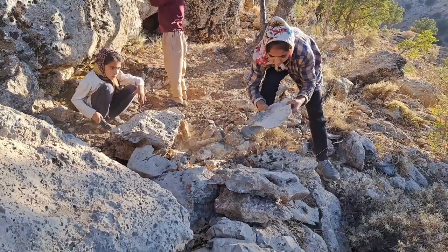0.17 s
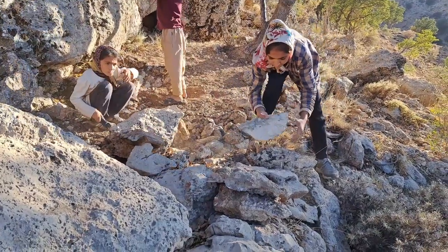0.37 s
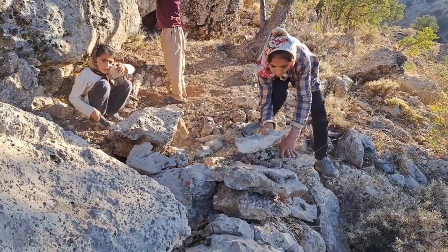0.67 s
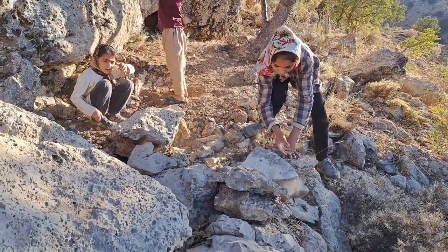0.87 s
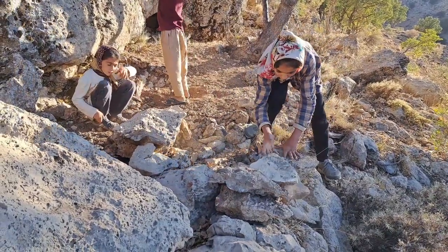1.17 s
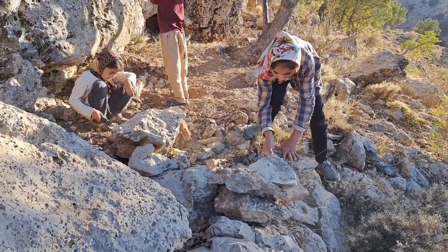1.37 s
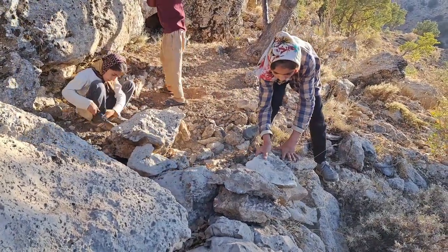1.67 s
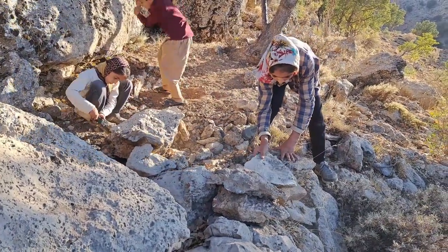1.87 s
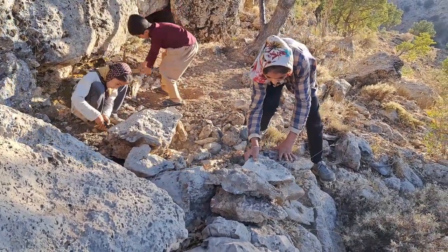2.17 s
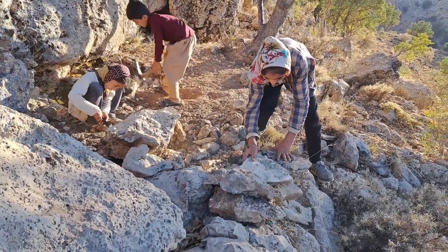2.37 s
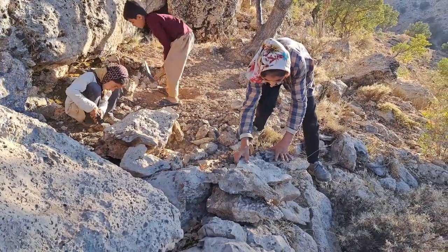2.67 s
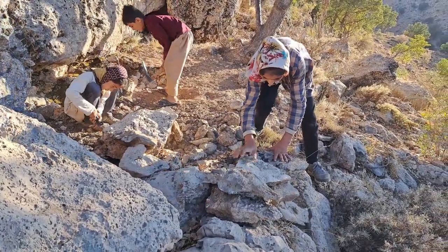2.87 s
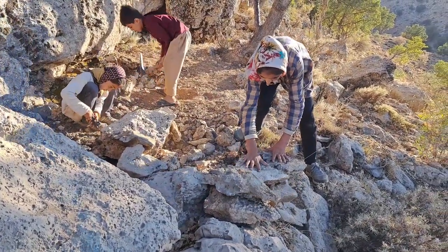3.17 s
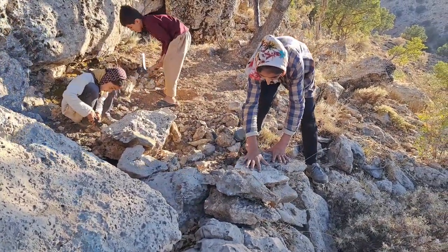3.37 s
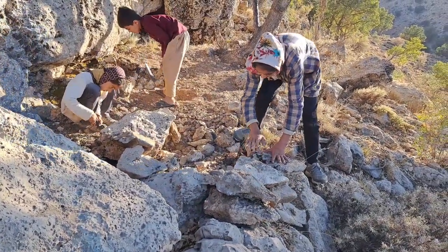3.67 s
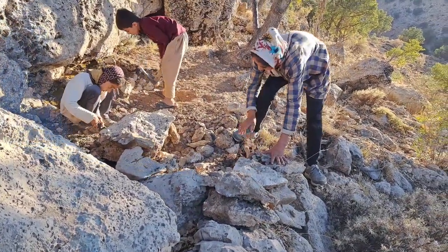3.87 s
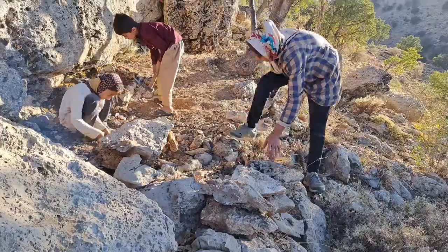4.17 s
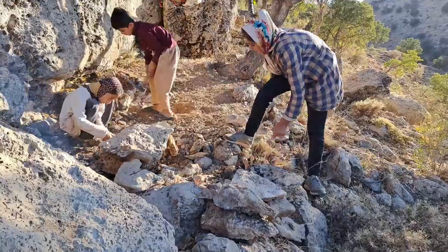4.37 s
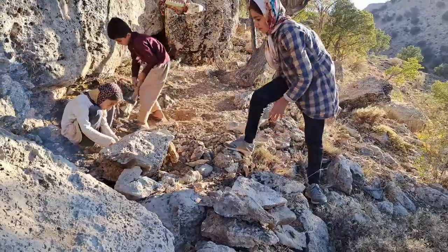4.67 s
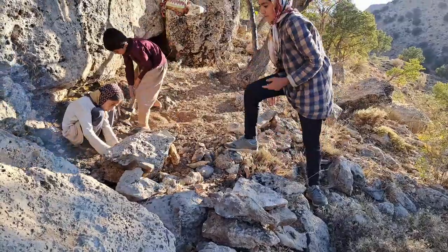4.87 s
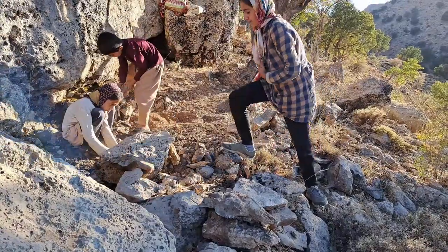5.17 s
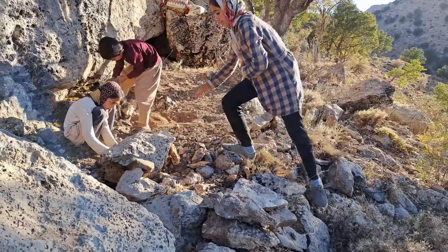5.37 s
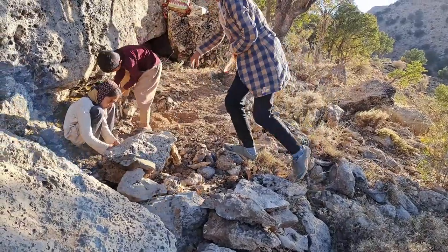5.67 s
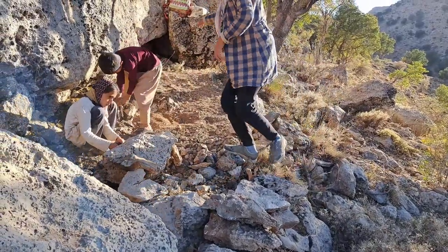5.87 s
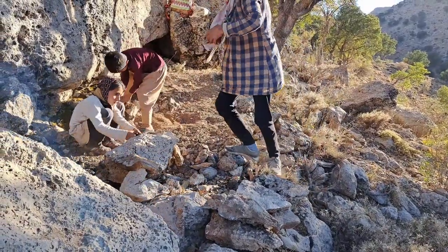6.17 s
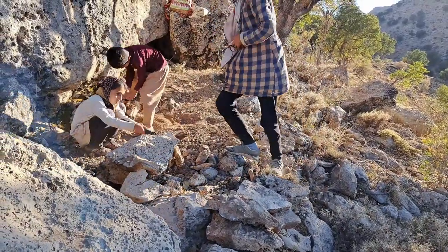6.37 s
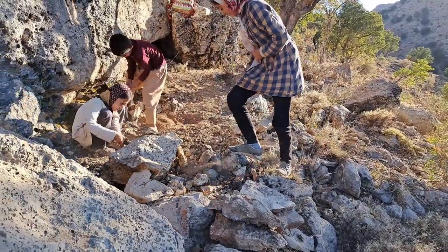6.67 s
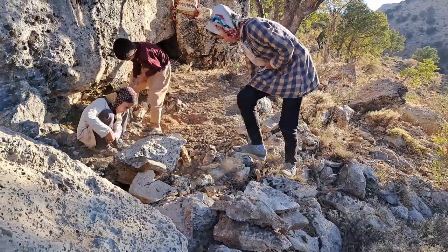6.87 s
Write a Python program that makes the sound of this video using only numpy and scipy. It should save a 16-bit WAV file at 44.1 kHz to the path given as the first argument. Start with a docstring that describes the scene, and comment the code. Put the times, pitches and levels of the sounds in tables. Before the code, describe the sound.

Close by on a quiet open hillside, light scuffs and ticks precede a flat stone slab landing with a hard ringing clink and a few rattling knocks. It grinds briefly; a smaller stone then cracks down sharply, scattering chips. More scraping settles the slab. Shoes crunch over grit and dry grass, heaviest near the end, with chattering pebbles. Faint air, low rumble and a far engine hum lie behind; stereo pickup.

```python
"""Limestone slab on a dry-stone wall

Close by, a flat slab clinks down, rocks and is ground into place: its modes ring, filtered grains rub.
A smaller stone cracks down beside it in short, high modes; contacts add noise clacks and ground thuds.
Shoes crunch over grit and dry grass, made of tiny random noise puffs; pebbles chatter, bright ticks snap.
Behind lies an open hillside: noise for air and low rumble, a far engine's harmonics, a weak rock echo."""
import sys
import numpy as np
from scipy import signal
from scipy.fft import rfft, irfft, next_fast_len
from scipy.io import wavfile
from scipy.ndimage import map_coordinates

SR = 44100
rng = np.random.default_rng(int(sys.argv[2]) if len(sys.argv) > 2 else 0)


def unload_audio(sound):
    """Save the sound as a 16-bit wav file, at the path given as the first command line argument."""
    columns = np.transpose(np.atleast_2d(sound))
    # keep every value between -1 and 1, then stretch to whole-number steps
    steps = np.round(np.clip(columns, -1, 1) * 32767)
    wavfile.write(sys.argv[1], SR, steps.astype(np.int16))


N = 309141
TIME = np.arange(N) / SR  # the whole scene, s
RING = np.arange(SR) / SR  # one second for a single sound, s


def amp(db):
    """Decibels to gain."""
    return 10 ** (np.asarray(db) / 20)


def unit(x):
    """Scale to rms 1."""
    return x / np.sqrt(np.mean(x ** 2) + 1e-20)


def along(points, hz):
    """Read (Hz, value) points on a log frequency axis."""
    point_hz, values = np.transpose(points)
    return np.interp(np.log(hz + 1), np.log(point_hz + 1), values)


def tone(points):
    """A gain over frequency from (Hz, dB) points."""
    return lambda hz: amp(along(points, hz))


def swell(rows):
    """Gain over time from (s, dB) rows."""
    return amp(np.interp(TIME, *np.transpose(rows)))


def wobble(rate):
    """A smooth random curve with this many knots a second."""
    knots = rng.standard_normal(int(N * rate / SR) + 4)
    return map_coordinates(knots, [TIME * rate])


def filtered(x, response):
    """Multiply the spectrum of x by a response of frequency."""
    n = x.shape[-1]
    size = next_fast_len(n + 8192)  # padded so the filter's tail does not wrap round
    hz = np.fft.rfftfreq(size, 1 / SR)
    return irfft(rfft(x, size) * response(hz), size)[..., :n]


def soft(hz, bright_hz):
    """A contact of finite length passes little above its brightness."""
    return 1 / np.sqrt(1 + (hz / bright_hz) ** 6)


def resonance(hz, centre_hz, q):
    """Gain of one resonance."""
    return 1 / np.sqrt(1 + q ** 2 * (hz / centre_hz - centre_hz / (hz + 1)) ** 2)


def panned(db):
    """Left and right gains for a level difference; positive is louder on the left."""
    return amp(np.array([[db], [-db]]) / 2)


# Likeness of the two microphones. Each row: frequency in Hz, left-right correlation.
MIC_LIKENESS = [(30, .4), (120, .93), (300, .88), (700, 0.66), (1400, 0.27), (3000, 0.081), (15000, 0.049)]


def spread(pair, colour):
    """Two unrelated signals become a coloured stereo pair of rms 1, alike in the bass."""
    def mid_side(hz):
        turn = np.arccos(np.clip(along(MIC_LIKENESS, hz), -1, 1)) / 2
        return colour(hz) * np.array([np.cos(turn), np.sin(turn)])

    mid, side = filtered(pair, mid_side)
    return unit(np.array([mid + side, mid - side]))


def noise(size, colour):
    """Coloured stereo noise of rms 1."""
    return spread(rng.standard_normal((2, size)), colour)


def dying(t60, attack):
    """A quick rise and an exponential decay."""
    return amp(-60 * RING / t60) * (1 - np.exp(-RING / attack))


def mode(hz, t60, pan_db, shift_hz=0, damping=1, lead=.00008):
    """One decaying sine; its phase leads at the left microphone as if reaching it a little earlier."""
    step = np.ones(SR) / SR
    cycles = np.cumsum(step * (hz + shift_hz)) + hz * np.array([[lead], [0]])
    decay = amp(-60 * np.cumsum(step * damping) / t60)
    attack = 1 - np.exp(-RING / 0.00025)
    return panned(pan_db) * np.sin(2 * np.pi * cycles) * decay * attack


def add(track, s, sound):
    """Mix a sound of up to one second into the track at time s."""
    room = track[:, round(s * SR):][:, :SR]
    room += sound[:, :room.shape[1]]


def grains(rate, spread_db, life):
    """Tiny fractures at random moments: short puffs of noise, a few much larger than the rest."""
    happens = rng.random(N) < rate / SR
    sizes = happens * amp(spread_db * np.minimum(rng.exponential(size=N), 4))
    power = signal.lfilter([1], [1, -np.exp(-1 / (life * SR))], sizes ** 2)
    return unit(np.sqrt(power) * rng.standard_normal((2, N)))


def chinks(rate, centre_hz, scatter, cycles):
    """Small stones touch at random, each ringing briefly at its own pitch; rms 1."""
    when, size, pitch, phase = np.transpose(rng.random((int(rate * N / SR), 4)))
    t = RING[:SR // 40]
    turns = centre_hz * np.exp(scatter * (2 * pitch[:, None] - 1)) * t
    rings = amp(-22 * size[:, None]) * np.exp(-turns / cycles)
    where = (when[:, None] * N).astype(int) + np.arange(len(t))
    # opposite phase offsets place each stone differently between the microphones
    ears = [rings * np.sin(2 * np.pi * turns + side * phase[:, None]) for side in (1, -1)]
    return unit(np.array([np.bincount(where.ravel(), ear.ravel(), N)[:N] for ear in ears]))


# a stroke climbs this far in its rise time and sinks as far in its fall time; 1 = pointed, 2 = bell
STROKE_DROP_DB, STROKE_ROUNDNESS = 19.5, 1.274


def strokes(rows):
    """Gain from (peak s, dB, rise s, fall s): each swells and dies away; overlaps add in power."""
    power = np.zeros(N)
    for s, db, rise, fall in rows:
        away = np.maximum((s - TIME) / rise, (TIME - s) / fall)
        near = away < 4
        level_db = db - STROKE_DROP_DB * np.abs(away[near]) ** STROKE_ROUNDNESS
        power[near] += amp(level_db) ** 2
    return np.sqrt(power)


# Colour of the open air. Each row: frequency in Hz, relative level in dB.
AIR_TONE = [(15, -39.5), (25, -23.5), (86, 3), (204, 5), (826, -11), (1240, -9.5), (1490, -20),
            (2630, -12.5), (3090, -31), (5580, -12.5), (9550, -23), (12800, -19), (15500, -24)]
# Swells of low rumble, from breeze, footfalls and the wall under a shove.
# Each row: peak in seconds, relative level in dB, rise and fall in seconds.
LOW_RUMBLES = [(.32, -51.5, 0.076, .28), (.57, -53, .15, 0.22), (1.23, -56.5, 0.17, 0.11),
               (1.61, -56, 0.072, 0.19), (2.57, -61.5, .2, 0.2), (3.3, -64.5, .15, 0.31),
               (4.8, -57.5, 0.057, 0.084), (6.02, -55.5, 0.058, 0.078), (6.31, -66, 0.23, .45),
               (6.96, -55.5, 0.089, .15)]
CALM_DB = -78  # rumble between the swells, on the same relative scale


def hillside():
    """Still air is gently wavering noise; breeze, footfalls and the shoved wall swell a low noise."""
    air = amp(-69.5 + 0.69 * wobble(0.93)) * noise(N, tone(AIR_TONE))
    low_noise = noise(N, lambda hz: resonance(hz, 65, q=1.0) ** 2)
    rumble = amp(-3.0) * (amp(CALM_DB) + strokes(LOW_RUMBLES)) * low_noise
    return air + rumble


# Swell of the engine across the valley. Each row: time in seconds, relative level in dB.
ENGINE_SWELL = [(0, -75.5), (1.0, -66.5), (1.8, -70), (2.4, -73.5), (3, -91.5), (7, -76.5)]
FIRING_HZ = 69.4  # mean firing rate


def far_engine():
    """Only the seventh and eighth harmonics of a distant engine carry, in a haze of noise."""
    turns = np.cumsum(FIRING_HZ + 0.13 * wobble(7.6)) / SR
    lines = np.zeros(N)
    for order, db in ((7, -2.5), (8, 0)):
        lines += amp(db + 2 * wobble(5)) * np.sin(2 * np.pi * order * turns)
    haze = amp(-0.5) * noise(N, lambda hz: resonance(hz, 480, q=2.4) ** 2)
    return swell(ENGINE_SWELL) * (lines + haze)


# Decay of the answer from the rocks. Each row: frequency in Hz, t60 in seconds.
ROCK_DECAY = [(100, .45), (1000, 0.36), (4000, .35), (14000, 0.16)]


def rocks(x):
    """The rock faces scatter a short answer: noise that dies sooner in the treble."""
    hz, t, bands = signal.stft(rng.standard_normal((2, SR // 2)), SR, nperseg=256)
    fading = amp(-60 * t / along(ROCK_DECAY, hz)[:, None])
    tail = signal.istft(bands * fading, SR, nperseg=256)[1]
    return signal.fftconvolve(x, tail / np.linalg.norm(tail[0]), axes=1)[:, :N]


# Colour of grit and dry grass underfoot. Each row: frequency in Hz, relative level in dB.
GRIT_TONE = [(88, -36.5), (150, -16), (462, 0.5), (550, -15), (695, -0.5), (894, -17), (1150, -2),
             (1510, -13), (1800, -2.5), (2980, -6), (5030, -2), (8010, -4.5), (9360, -14), (12300, -5.5),
             (15500, -13)]
# Scuffs of shoes and hands. Each row: peak in seconds, relative level in dB, rise and fall in seconds.
SCUFFS = [(.035, -49, .11, .08), (.26, -59.5, 0.31, .27), (.5, -67, .15, 0.17), (.65, -55.5, 0.081, .2),
          (1.69, -68, 0.069, .08), (1.833, -55, .045, .04), (1.985, -59.5, 0.0502, .06),
          (2.085, -52.5, .03, .15), (2.24, -55.5, .08, 0.091), (2.56, -59.5, .2, .15),
          (2.78, -60.5, .025, 0.055), (3.45, -67.5, 0.1, 0.35), (3.8, -60.5, 0.32, .45),
          (4.13, -55, .22, 0.19), (4.34, -47.5, 0.048, .06), (4.42, -58, 0.11, .34),
          (4.62, -58, 0.0256, 0.159), (4.85, -63, 0.16, 0.17), (5.06, -60.5, 0.3, .2),
          (5.28, -51.5, .25, 0.19), (5.54, -53, 0.23, 0.136), (5.68, -57, 0.042, 0.088),
          (5.8, -52.5, 0.056, 0.29), (6.04, -37, 0.091, .11), (6.2, -44.5, .2, .13),
          (6.35, -45.5, .13, .05), (6.555, -44, 0.057, .04), (6.65, -49.5, 0.5, 0.31),
          (6.96, -58, .1, 0.306)]
# below LIGHT_HZ grit gains this many extra dB per dB of scuff, and is unaltered at FULL_WEIGHT_DB
LIGHT_HZ, WEIGHT_SHARE, FULL_WEIGHT_DB = 3070, 0.14, -45


def scuffing():
    """Coarse, medium and fine grit and grass break in their own time; a light touch is thinner."""
    sizes = np.zeros((2, N))
    for centre_hz in (1300, 4800, 12500):
        fractures = grains(rate=2200, spread_db=4.0, life=0.0011) * amp(1.8 * wobble(35))
        sizes += filtered(fractures, lambda hz: resonance(hz, centre_hz, q=1.1))
    hiss = amp(-5.5) * rng.standard_normal((2, N))
    crackle = spread(unit(sizes) + hiss, tone(GRIT_TONE))
    low = filtered(crackle, lambda hz: soft(hz, LIGHT_HZ))
    force = strokes(SCUFFS)
    weight = (force / amp(FULL_WEIGHT_DB)) ** WEIGHT_SHARE
    return amp(1.5) * force * (crackle - low + weight * low) * panned(-4)


# A sole or hand drags over pebbles.
# Each row: peak in seconds, relative level in dB, rise and fall in seconds.
DRAGS = [(.66, -59, .07, 0.11), (1.833, -53, 0.037, 0.056), (2.24, -52.5, .06, .09),
         (4.13, -49, 0.11, 0.14), (4.63, -51.5, .04, .1), (5.22, -49, .07, .15), (6.07, -43, 0.068, 0.5),
         (6.33, -42.5, 0.077, 0.059), (6.55, -46, 0.091, 0.075), (6.69, -56.5, .12, .12)]


def dragging():
    """Pebbles chatter under a sliding sole or hand, as random brief rings."""
    pebbles = chinks(rate=1000, centre_hz=2291, scatter=.8, cycles=5)
    return amp(-6.5) * strokes(DRAGS) * pebbles * panned(-1.2)


# Short bright ticks: pebbles, dry stalks and the sharp edge of slab contacts.
# Each row: start in seconds, level in dB, centre in Hz.
TICKS = [(.0135, -41.5, 4500), (.0343, -41, 4580), (.1176, -43.5, 4700), (.2169, -42.5, 6340),
         (.3169, -44, 6390), (.614, -42.5, 6540), (.633, -47, 4080), (.8275, -39, 4804),
         (.8822, -31.5, 3998), (0.9661, -44, 5530), (1.032, -51.5, 6500), (1.218, -46.5, 5950),
         (1.7419, -43.5, 5050), (1.8168, -48, 4100), (2.0757, -44.5, 2598), (2.1076, -48, 5310),
         (2.367, -46.5, 5600), (2.5551, -45.5, 4500), (2.7077, -52, 4300), (2.884, -53.5, 9000),
         (3.3544, -53, 5090), (3.681, -46.5, 5430), (3.752, -57.5, 2500), (4.0143, -48.5, 2400),
         (4.6094, -41, 6240), (4.7691, -46.5, 5380), (4.8574, -38, 11700), (5.292, -42.5, 11100),
         (5.5623, -44.5, 12150), (5.582, -44.5, 9000), (6.138, -34, 4700), (6.335, -42, 4200),
         (6.347, -38.5, 7000), (6.552, -41.5, 3200), (6.6707, -40, 12900)]
TICK_CYCLES = 150  # a tick decays 60 dB within this many cycles, so higher ones are shorter


def ticks():
    """Pebbles, stalks and sharp slab contacts tick as noise round a pitch; a longer ring is narrower."""
    out = np.zeros((2, N))
    for s, db, centre_hz in TICKS:
        t60 = TICK_CYCLES / centre_hz
        tick = noise(SR, lambda hz: resonance(hz, centre_hz, q=95 * t60))
        add(out, s, amp(db) * tick * dying(t60, attack=0.00057))
    return out * panned(-4.5)


# Modes of the smaller stone.
# Each row: frequency in Hz, relative level in dB, t60 in seconds, left-right difference in dB.
STONE_MODES = [(1235, -0.5, 0.027, 1), (1766, -4, 0.056, -9.5), (2120, -12.5, 0.041, -19.5),
               (2455, -6.5, 0.055, -2.5), (3125, -7, 0.027, 8.5), (3176, 0, 0.063, -2),
               (4056, -20.5, 0.173, -2.5), (6190, -22.5, 0.18, -16.5), (6910, -19, 0.084, -19.5),
               (7350, -32.5, .1, -12), (11390, -23, 0.12, -10), (12330, -17, .035, -13.5),
               (13336, -22.5, 0.086, -12)]
# The smaller stone lands and settles. Each row: start in seconds, level in dB.
STONE_DROPS = [(2.1348, -14.5), (2.2394, -46)]


def small_stone():
    """The smaller stone rings higher and shorter, and sets loose chips skittering."""
    out = np.zeros((2, N))
    ring = sum(amp(db) * mode(hz, t60, pan_db) for hz, db, t60, pan_db in STONE_MODES)
    for s, db in STONE_DROPS:
        chips = chinks(rate=1600, centre_hz=3067, scatter=.85, cycles=9)[:, :SR]
        chips = chips * dying(t60=0.16, attack=0.0042)
        add(out, s, amp(db) * (ring + amp(-23) * chips))
    return out


# Dead knocks of the smaller stone or of a shoe on rock. Each row: start in seconds, clack level in dB,
# brightness in Hz, t60 in seconds, ground thud in relative dB.
KNOCKS = [(1.281, -57.5, 990, 0.2, -53.5), (1.731, -49.5, 1450, .1, -50), (1.8314, -51, 3020, 0.054, -56.5),
          (2.134, -10, 3800, 0.025, -22.5), (2.15, -38, 4000, 0.11, -42.5), (2.79, -52, 2000, .0465, -50),
          (3.005, -57, 3985, .048, -69), (4.058, -50, 2496, .025, -74.5), (4.775, -61.5, 600, .14, -54.5),
          (5.2, -55, 350, 0.57, -72), (5.7558, -43, 5160, .1, -37.5), (6.946, -44.5, 2524, 0.047, -54.5)]
# Colour of a bare contact. Each row: frequency in Hz, relative level in dB.
CLACK_TONE = [(60, -24.5), (200, -5.5), (600, 2), (1200, -1.5), (3000, -4), (8000, 1), (15000, -3.5)]
# Colour of the loose fill shaken by it. Each row: frequency in Hz, relative level in dB.
FILL_TONE = [(20, -30), (60, -3), (130, 1), (220, -5), (400, -24.5), (1200, -61), (4000, -100)]
# Modes of wall and soil under a blow. Each row: frequency in Hz, relative level in dB, t60 in seconds.
GROUND_MODES = [(69, -21.5, 0.18), (96, -17.5, 0.14), (148, 1.5, 0.049), (205.3, -8.5, .07),
                (250, -1, .035)]
SLAB_CLACK_HZ, SLAB_CLACK_T60_S = 1250, .043  # the heavy slab always clacks dull and short


def knocks():
    """Each contact gives a dead clack with a faint spray of grit, and shakes the wall and soil below."""
    out = np.zeros((2, N))
    ground = sum(amp(db) * mode(hz, t60, pan_db=2.5) for hz, db, t60 in GROUND_MODES)
    ground = ground * (1 - np.exp(-RING / 0.0019))
    slab_knocks = [(s, db, SLAB_CLACK_HZ, SLAB_CLACK_T60_S, thud_db)
                   for s, _, _, _, db, thud_db in SLAB_BLOWS]
    for s, db, bright_hz, t60, thud_db in slab_knocks + KNOCKS:
        spray = (bright_hz / 11000) ** 2  # lets some treble past the soft contact
        colour = lambda hz: tone(CLACK_TONE)(hz) * (soft(hz, bright_hz) + spray)
        clack = noise(SR, colour) * dying(t60, attack=0.00082) * panned(-1.3)
        fill = amp(-8.5) * noise(SR, tone(FILL_TONE)) * dying(t60=0.25, attack=.002)
        add(out, s, amp(db) * clack + amp(thud_db) * (amp(6.5) * ground + fill))
    return out


# Colour of stone grinding on grit. Each row: frequency in Hz, relative level in dB.
GRIND_TONE = [(35, -38.5), (60, -22.5), (138, 1), (526, -12.5), (633, 1), (916, -8.5), (1030, -19.5),
              (1270, -9.5), (2310, -10.5), (2650, -11.5), (3120, -20.5), (12800, -32), (15000, -34.5)]
# Hands shift the slab. Each row: hardest push in seconds, grinding and ringing in relative dB,
# rise and fall in seconds.
SHOVES = [(.33, -78, -69, 0.18, 0.25), (1.09, -72, -55.5, 0.22, 0.29), (1.66, -82, -68.5, 0.14, 0.12),
          (1.745, -52, -56.5, 0.035, .06), (2.5, -53, -57, 0.11, .08), (2.619, -44.5, -56.5, .14, 0.17),
          (3.015, -64, -66.5, .015, 0.074), (3.08, -56, -62, 0.086, .12),
          (3.447, -56.5, -58.5, 0.018, 0.047)]


def grinding():
    """The slab sticks and slips over grit and pebbles: grain bursts and small rings under each push."""
    slips = spread(grains(rate=600, spread_db=2.5, life=0.0012), tone(GRIND_TONE))
    pebbles = chinks(rate=260, centre_hz=876, scatter=.6, cycles=9)
    push = strokes([(s, db, rise, fall) for s, db, _, rise, fall in SHOVES])
    return push * (amp(-3) * slips + amp(-7.5) * pebbles) * panned(-0.38)


LANDING_S, SEATING_S = .855, .15  # first full contact; time constant of bedding down
LOOSE_HZ, SEATED_HZ = -14.5, 42.8  # shift of every mode
LOOSE_DAMPING, SEATED_DAMPING = 0.97, 1.7  # factor on the speed of decay


def seating(s):
    """As the slab beds down on the wall its modes rise and die sooner: shift in Hz and damping."""
    loose = np.exp(-np.maximum(s - LANDING_S, 0) / SEATING_S)
    shift_hz = SEATED_HZ + loose * (LOOSE_HZ - SEATED_HZ)
    damping = SEATED_DAMPING + loose * (LOOSE_DAMPING - SEATED_DAMPING)
    return shift_hz, damping


# Colour of friction along the edge. Each row: frequency in Hz, relative level in dB.
FRICTION_TONE = [(1100, -7), (1950, -0.5), (2700, -0.5), (3500, -13.5), (4500, -5.5), (5400, -14),
                 (6500, -14.5), (8000, -23.5)]


def rubbing():
    """Uneven slips along the slab's edge keep its seated modes ringing."""
    def body(hz):
        modes = sum(resonance(hz, row[0] + SEATED_HZ, q=55) ** 2 for row in SLAB_MODES)
        return tone(FRICTION_TONE)(hz) * modes

    push = strokes([(s, db, rise, fall) for s, _, db, rise, fall in SHOVES])
    return push * spread(grains(rate=200, spread_db=3.5, life=.001), body) * panned(-4)


# Modes of the slab, before seating shifts and damps them. Each row: frequency in Hz, relative dB
# struck on its face, relative dB struck on its edge, t60 in seconds, left-right difference in dB.
SLAB_MODES = [(1073, -21, -5.5, 0.6, 2.2), (1248, 1.5, -4, 0.36, -3.5), (1928, -2.5, -12, 0.22, 5.5),
              (2632, -28, 3, 0.22, -6.5), (3569, -20, -22.5, 0.16, -9), (4303, -30.5, -14.5, 0.27, -7.5),
              (4620, -45, -14, 0.25, -0.5), (5044, -17, -10, 0.098, -10), (5570, -34, -6.5, 0.21, -18),
              (6200, -39.5, -20.5, 0.23, -5), (8195, -35, -26, 0.18, -1)]
# The slab meets the wall. Each row: start in seconds, ring in dB, place from 0 face to 1 edge,
# brightness of the ring's contact in Hz, clack in dB, ground thud in relative dB.
SLAB_BLOWS = [(0.8278, -31, 0.47, 6900, -43, -44), (0.8564, -7, 0.069, 2220, -20.5, -41),
              (0.869, -19.5, .2, 2000, -32.5, -49.5), (0.882, -11.5, .12, 5870, -25, -58),
              (.921, -56, .5, 2010, -33, -51), (.9465, -45.5, .07, 3000, -28.5, -43),
              (0.965, -45, 0.92, 6600, -28, -49), (1.013, -47.5, 0.7, 7100, -42, -48),
              (1.167, -43.5, 0.92, 5550, -41, -48.5), (1.204, -56.5, 0.96, 3000, -37, -49),
              (1.454, -54.5, 0.65, 2270, -49.5, -55.5), (1.9772, -55.5, .69, 7125, -56.5, -70),
              (2.503, -48.5, 0.35, 6070, -47.5, -43), (2.543, -53, 0.88, 3000, -40.5, -47),
              (2.616, -50, 1, 3000, -53, -53), (3.213, -61.5, 1, 1200, -57, -59.5),
              (3.442, -47, 0.64, 2500, -50.5, -51.5), (3.497, -53, 0.97, 1210, -39.5, -48.5)]


def slab():
    """The place of each blow decides which modes ring; the ragged edge answers differently each time."""
    out = np.zeros((2, N))
    for hz, face_db, edge_db, t60, pan_db in SLAB_MODES:
        ring = np.zeros((2, N))
        for s, db, place, bright_hz, _, _ in SLAB_BLOWS:
            edge = np.clip(place, 0, 1)
            ragged_db = edge_db + 2 * rng.normal()
            level_db = db + (1 - edge) * face_db + edge * ragged_db
            shift_hz, damping = seating(s + RING)
            struck = mode(hz, t60, pan_db, shift_hz, damping)
            add(ring, s, amp(level_db) * soft(hz, bright_hz) * struck)
        # chattering contact with the wall makes the ring flutter, by about 1.5 dB
        out += ring * amp(1.5 * wobble(70))
    return out


def scene():
    """Stones and footsteps close by on the open hillside, with the rocks' weak answer."""
    stones = slab() + rubbing() + grinding() + small_stone() + knocks()
    near = stones + ticks() + scuffing() + dragging()
    return near + amp(-21.5) * rocks(near) + hillside() + far_engine()


TOP_HZ = 15850  # band limit


def record(dry):
    """The microphone chain passes only what lies below its band limit."""
    return filtered(dry, lambda hz: hz < TOP_HZ)


dry = scene()
out = record(dry)
unload_audio(out)
```